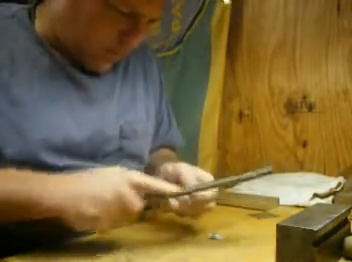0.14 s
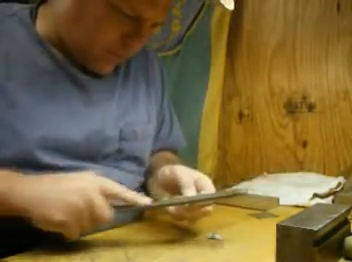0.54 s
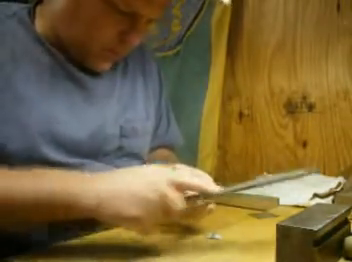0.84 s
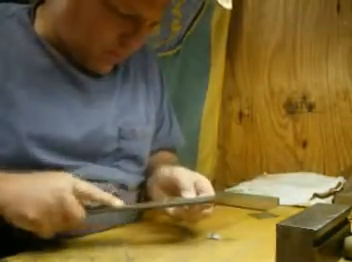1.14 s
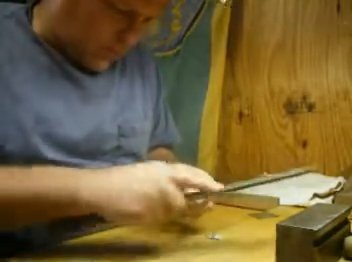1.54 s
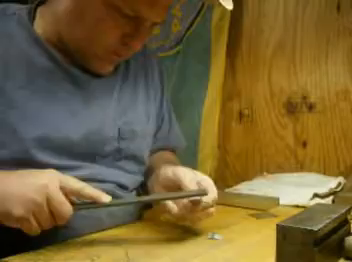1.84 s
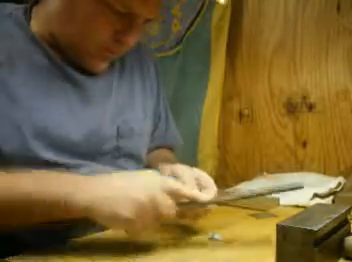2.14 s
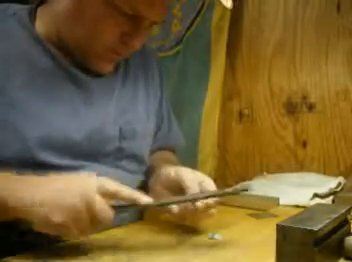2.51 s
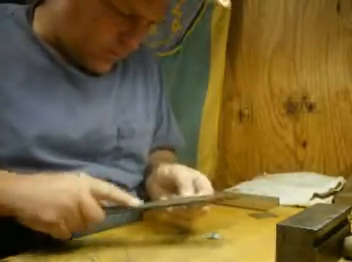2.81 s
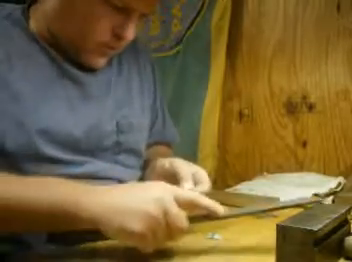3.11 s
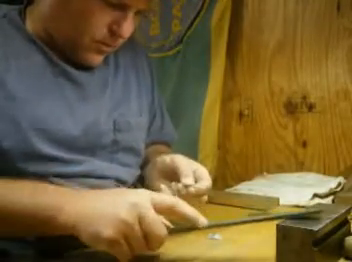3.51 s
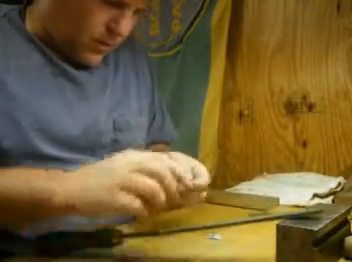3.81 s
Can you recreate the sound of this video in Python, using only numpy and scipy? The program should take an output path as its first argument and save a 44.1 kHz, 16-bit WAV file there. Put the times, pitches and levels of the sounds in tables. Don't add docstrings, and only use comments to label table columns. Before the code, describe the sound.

A hand file rasps on a metal strip, already mid-stroke until 0.16 s, then pushes at about 0.6-0.9, 1.3-1.6, 2.05-2.35 and 2.85-3.1 s. Each is gritty and metallic, singing around its ticks and clicking off. Soft bumps fall at 1.8 and 2.4 s. The file clatters and skids on wood at 3.38 s; the strip clacks loudest at 3.63-3.7 s. Dry small shop, faint hum, coarse lo-fi sound.

```python
import sys
import numpy as np
from scipy import signal
from scipy.fft import rfft, irfft
from scipy.io import wavfile
from scipy.ndimage import uniform_filter1d

SR = 44100
rng = np.random.default_rng(int(sys.argv[2]) if len(sys.argv) > 2 else 0)


def linear_from_db(decibels):
    return 10 ** (np.asarray(decibels, float) / 20)


def put_to_file(sound):
    columns = np.atleast_2d(sound).T
    safe = np.clip(columns, -1, 1)
    whole_steps = np.round(safe * 32767)
    wavfile.write(sys.argv[1], SR, whole_steps.astype(np.int16))


N = 174195


def rms_one(x):
    return x / np.sqrt(np.mean(x ** 2) + 1e-20)


def drift(rate_hz):
    r = np.exp(-40 * np.pi * rate_hz / SR)
    slow = signal.lfilter([1], [1, -2 * r, r * r], rng.standard_normal(N // 20 + 2002))[2000:]
    return np.interp(np.arange(N) / 20, np.arange(len(slow)), rms_one(slow))


def ring(hits, hz, t60):
    r, w = linear_from_db(-60 / (max(t60, 0.005) * SR)), 2 * np.pi * hz / SR
    return signal.lfilter([0, np.sin(w)], [1, -2 * r * np.cos(w), r * r], hits + 1e-18)


def resonate(x, hz, width_hz):
    r = np.exp(-np.pi * width_hz / SR)
    feedback = [1, -2 * r * np.cos(2 * np.pi * hz / SR), r * r]
    return signal.lfilter(np.array([1, 0, -1]) * (1 - r * r) / 2, feedback, x + 1e-18)


def colour(x, spectrum):
    hz, db = np.transpose(spectrum)
    gain = linear_from_db(np.interp(np.log(np.fft.rfftfreq(N, 1 / SR) + 1), np.log(hz), db))
    return rms_one(irfft(rfft(x) * gain, N))


def envelope(rows):
    t = np.arange(N) / SR
    s, db, *more = np.transpose(rows)
    inside = (t >= s[0]) & (t <= s[-1])
    gain = inside * linear_from_db(np.interp(t, s, db))
    progress = inside * (t - s[0]) / (s[-1] - s[0])
    return gain, progress, inside * np.interp(t, s, [db, *more][-1])


def clicks(s, db):
    out = np.zeros(N)
    out[(np.asarray(s) * SR).astype(int)] = linear_from_db(db)
    return out


def teeth():
    teeth_per_s, spread_db, chatter_db, chatter_hz = 9000, 2.6, 1.2, 150
    sizes = linear_from_db(spread_db * np.minimum(rng.exponential(1, N), 5)) * rng.choice([-1, 1], N)
    caught = rng.random(N) < teeth_per_s / SR
    return rms_one(sizes * caught * linear_from_db(chatter_db * drift(chatter_hz)))


def blows(hits, modes, crack_db, crack_s, crack_hz, extra=0, sign=-1):
    longest_s, most_cycles = 0.095, 95
    s, db, hardness_db = np.transpose(hits)
    luck_db = rng.normal(0, 1.2, (len(s), len(modes)))
    out = np.zeros(N)
    for k, (hz, level_db, t60) in enumerate(modes):
        strike_db = db + level_db - 5 + luck_db[:, k] + hardness_db * np.log2(hz / 1000)
        push = clicks(s, strike_db) + linear_from_db(level_db) * extra
        out += sign ** k * ring(push, hz, min(t60, longest_s, most_cycles / hz))
    dying = [1, -np.exp(-1 / (crack_s * SR))]
    fade = signal.lfilter([1], dying, clicks(s, db + crack_db + hardness_db))
    crack = signal.sosfilt(signal.butter(2, crack_hz, fs=SR, output="sos"), rng.standard_normal(N))
    return out + fade * rms_one(crack)


def lamp_hum():
    # f/Hz, level/dB
    hum_tones = [(120, -63.5), (360, -57), (600, -60)]
    out = np.zeros(N)
    for hz, db in hum_tones:
        turns = hz * np.arange(N) / SR + rng.random()
        out += linear_from_db(db + 2.5 + 2.0 * drift(3.7)) * np.sin(2 * np.pi * turns)
    return out


def room_tone():
    # f/Hz, level/dB
    air_colour = [(12, -17.5), (20, -14), (32, -37.5), (119, -15.5), (330, -12), (360, -13), (385, -15),
                  (698, -13), (3900, -25), (5070, -90), (8580, -120)]
    return linear_from_db(-44 + 0.18 * drift(1.7)) * colour(rng.standard_normal(N), air_colour)


def shop(x):
    t60_s, wall_cut_hz = 0.26, 3300
    out, dull = np.zeros(N), np.exp(-2 * np.pi * wall_cut_hz / SR)
    for k, lag in enumerate((rng.uniform(0.009, 0.03, 10) * SR).astype(int)):
        loop, gain, state = x.copy(), linear_from_db(-60 * lag / SR / t60_s), [0.0]
        for i in range(lag, N, lag):
            back, state = signal.lfilter([gain * (1 - dull)], [1, -dull], loop[i - lag:i], zi=state)
            loop[i:i + lag] += back[:N - i]
        out += (loop - x) * (-1) ** k
    return out


def bench_gives():
    # t/s, peak level/dB, f/Hz, t60/s
    thumps = [
        (3.376, -32.5, 148, 0.091),
        (3.438, -28, 190, 0.077),
        (3.49, -32, 202, 0.093),
        (3.631, -27, 45.3, 0.099),
        (3.673, -24, 117, 0.089),
    ]
    return sum(ring(clicks([s], db), hz, t60) for s, db, hz, t60 in thumps)


def hand_knocks():
    # t/s, peak level/dB, f/Hz, t60/s
    bumps = [
        (1.802, -33.5, 308, 0.067),
        (1.809, -37, 448, 0.085),
        (2.388, -25, 285, 0.043),
        (2.389, -35, 598, 0.068),
        (2.4, -26, 319, 0.078),
        (2.401, -42, 546, 0.081),
    ]
    return sum(ring(clicks([s], db), hz, t60) for s, db, hz, t60 in bumps)


def dropped_file():
    # t/s, peak level/dB, hardness/(dB per octave)
    landings = [
        (3.3765, -5, -4.5),
        (3.379, -12, 7),
        (3.3875, -21.5, 7.5),
        (3.404, -24.5, -5),
        (3.42, -26, 7),
        (3.428, -19.5, 3.5),
        (3.444, -23.5, 3.5),
        (3.453, -24.5, 1),
        (3.464, -17.5, -8),
        (3.488, -27.5, -5),
    ]
    # f/Hz, level/dB, t60/s
    lying_modes = [(295, -5, .07), (344.4, -4, 0.03), (440, -20.5, 0.024), (543, -1, 0.063),
                   (607, 0.5, 0.045), (661, 1.5, 0.05), (968, -14.5, 0.061), (1235, -15, 0.033),
                   (1522, -3.5, 0.034), (1694, -7, 0.02), (2400, -16, 0.04), (2890, -14.5, 0.041),
                   (3190, -3.5, 0.022), (3354, -10, 0.041)]
    # t/s, level/dB
    skid_level = [(3.378, -18), (3.41, -20), (3.43, -19.5), (3.445, -22), (3.458, -20.5), (3.472, -37),
                  (3.54, -51.5)]
    skid = linear_from_db(-24.5) * envelope(skid_level)[0] * teeth()
    knocks = blows(landings, lying_modes, -9.5, 0.0082, 2600, skid)
    return knocks + linear_from_db(6.0) * resonate(skid, 2300, 3700)


def strip_put_down():
    # t/s, peak level/dB, hardness/(dB per octave)
    edge_hits = [
        (3.632, 1.5, 1.5),
        (3.636, -11, -2),
        (3.643, -5.5, -5),
        (3.652, -8, 1.5),
        (3.661, -19, -1.5),
    ]
    # t/s, peak level/dB, hardness/(dB per octave)
    flat_hits = [
        (3.672, -2, 3),
        (3.6764, -19, 9),
        (3.682, -17, -2),
        (3.695, -19, -0.5),
        (3.708, -25.5, 6.5),
    ]
    # f/Hz, level/dB, t60/s
    edge_ring = [(306, 1.5, 0.029), (393, -7, 0.023), (564, -5.5, 0.036), (681, -2.5, 0.059),
                 (1058, -8, 0.067), (1190, -12.5, 0.02), (1507, -5.5, 0.026), (1640, -7.5, 0.027),
                 (1900, -33, 0.047), (2525, -13.5, 0.08), (2993, -19.5, 0.032), (3400, -17, 0.04),
                 (3700, -7.5, 0.04)]
    # f/Hz, level/dB, t60/s
    flat_ring = [(352, -13.5, .095), (433, -3.5, 0.039), (590, 8.5, 0.027), (635, 2.5, 0.03),
                 (682, 7, 0.039), (889, 0.5, 0.07), (1021.5, 4.5, 0.082), (1244, -3.5, 0.15),
                 (1344, -7, 0.08), (1670, 1.5, 0.018), (1860, -6, 0.017), (2400, -13, 0.051),
                 (3250, -23, 0.042)]
    edge = blows(edge_hits, edge_ring, -12.5, 0.0079, 3500)
    return edge + blows(flat_hits, flat_ring, -7.5, 0.008, 1500, sign=0.96)


def bench():
    knocks = hand_knocks() + dropped_file() + strip_put_down()
    no_bass = signal.butter(3, 275, "high", fs=SR, output="sos")
    return bench_gives() + signal.sosfilt(no_bass, knocks)


def file_ticks():
    # t/s, peak level/dB, f/Hz
    pings = [(.144, -15, 2290), (0.558, -19.5, 2560), (0.581, -25, 1500), (0.707, -10, 1850),
             (0.755, -10, 3220), (0.869, -18.5, 2210), (0.8718, -7, 2250), (1.266, -23, 2610),
             (1.459, -5.5, 3480), (1.497, -12, 2400), (1.567, -14.5, 700), (2.045, -14, 3160),
             (2.07, -7, 3100), (2.149, -9, 3500), (2.208, -4, 3180), (2.319, -6, 2640),
             (2.833, -28.5, 3000), (2.939, -11.5, 3100), (3.031, -20, 1900), (3.069, -10, 1444),
             (3.071, -18, 2400)]
    return sum(ring(clicks([s], db), hz, 4 / hz) for s, db, hz in pings)


def singing(mode_hz):
    # start t/s, end t/s, lift/dB, mode f/Hz
    songs = [(0, 0.024, 4.5, 1498), (.045, 0.124, 10.5, 1498), (.05, 0.102, 2.5, 2346),
             (.69, 0.767, 4, 3168), (0.604, 0.645, 4, 2502), (0.612, 0.635, 3.5, 476),
             (0.673, 0.669, 7, 3564), (0.748, 0.783, 4, 3564), (0.736, 0.828, 3.5, 1498),
             (0.802, 0.838, 7, 2346), (0.747, 0.788, 3, 476), (1.413, 1.476, 2.5, 3168),
             (1.48, 1.534, 5, 2346), (1.488, 1.558, 5.5, 1498), (1.467, 1.473, 15.5, 692),
             (2.136, 2.146, 12, 3564), (2.122, 2.265, 1.5, 476), (2.209, 2.231, 6, 3168),
             (2.252, 2.282, -3, 3564), (2.253, 2.328, 9.5, 1498), (2.291, 2.34, 9.5, 3168),
             (2.896, 2.924, 11, 3168), (2.932, 2.944, 8.5, 1498), (2.967, 3.025, 3, 2346),
             (3.051, 3.097, 8, 1498)]
    t = np.arange(N) / SR
    lift = np.zeros((len(mode_hz), N))
    for start, end, db, hz in songs:
        nearest = np.argmin(abs(mode_hz - hz))
        lift[nearest] += uniform_filter1d(db * ((t > start) & (t < end)) + 0.0, size=600)
    return lift


def filing():
    # t/s, level/dB, treble lift from speed/dB
    pushes = [
        [(0.0, -14.5, -11), (0.012, -19, -10), (0.03, -21.5, -4.5), (0.09, -24.5, -7), (0.135, -31.5, 2.5),
         (0.15, -40, 7.5), (0.165, -63, -1)],
        [(0.575, -37, -3), (0.61, -30.5, 1.5), (0.68, -26, -3.5), (0.75, -24.5, 2), (0.815, -23, -6.5),
         (0.858, -24.5, -5.5), (0.872, -22.5, -2.5), (0.885, -51, -1)],
        [(1.285, -47.5, 1), (1.31, -30.5, -5), (1.35, -27, -9.5), (1.42, -24.5, -6), (1.465, -25.5, 3),
         (1.505, -23, -1), (1.55, -22.5, -9.5), (1.57, -22, 0), (1.595, -64, -8)],
        [(2.06, -29.5, 1), (2.072, -32.5, 9), (2.09, -27, 3), (2.15, -22.5, 1), (2.19, -24.5, -8),
         (2.25, -22, 0.5), (2.3, -26, 4), (2.325, -27.5, -10), (2.345, -48.5, 1)],
        [(2.83, -42.5, 10.5), (2.865, -40.5, 1), (2.905, -28, -3.5), (2.945, -30.5, -5), (2.98, -30.5, -5.5),
         (3.032, -22.5, -7.5), (3.062, -27, -1.5), (3.072, -21, -3.5), (3.085, -48, -2)],
    ]
    # f/Hz, width/Hz, level early/dB, level midway/dB, level late/dB
    blade_modes = [(439.4, 170, -5.5, -9, -23), (476, 76, 3, 3.5, -6), (692, 43, -10, -6, -6),
                   (1004, 130, -1.5, -3, -4.5), (1118, 102, -9, -10.5, -8), (1498, 52, -2.5, 0.5, -3),
                   (1710, 100, -23.5, -16.5, -1), (1900, 100, 0, 3, -1), (2304, 420, -12, -4.5, -8),
                   (2502, 30, 0.5, 7, 0), (2700, 670, -44.5, -19, -18.5), (3168, 48, -2.5, 5.5, 3),
                   (3510, 66, -8.5, -12.5, -6.5), (3564, 43, -1.5, 9.5, -9)]
    # f/Hz, level/dB
    rasp_colour = [(30, -25.5), (70, -19), (130, -28), (280, -9.5), (450, -13.5), (1200, -4), (2300, -2),
                   (3300, 3), (4000, -4)]
    pressure, along, lift_db = np.sum([envelope(rows) for rows in pushes], axis=0)
    first = int(0.2 * SR)
    along[:first] = 0.5 + along[:first] / 2
    grains, ticks = teeth(), file_ticks()
    sing_db = singing(np.transpose(blade_modes)[0])
    wander_db, wander_hz, narrowest_hz = 1.2, 14, 75
    gains = [linear_from_db(np.interp(along, [0, 0.5, 1], db) + wander_db * drift(wander_hz))
             for _, _, *db in blade_modes]

    def blade(x, extra_db):
        out = np.zeros(N)
        for k, (hz, width_hz, *_) in enumerate(blade_modes):
            push = x * gains[k] * linear_from_db(extra_db[k])
            out += (-1) ** k * resonate(push, hz, max(width_hz, narrowest_hz))
        return out

    drive = grains * pressure / np.std(blade(grains, 0 * sing_db)) + linear_from_db(2) * ticks
    rasp = blade(drive, sing_db) + linear_from_db(1.5) * pressure * colour(grains, rasp_colour)
    low = signal.sosfiltfilt(signal.butter(2, 2740, fs=SR, output="sos"), rasp)
    return low + linear_from_db(lift_db) * (rasp - low) + ticks


def scene():
    work = filing() + bench()
    return (work + linear_from_db(-19) * shop(work) + room_tone() + lamp_hum())[None]


def top_cut(x):
    return signal.sosfilt(signal.butter(12, 15580, fs=SR, output="sos"), x)


def record(dry):
    sampling_hz, steps, offset, clip_top = 8000, 128, -0.0064, 1.03
    slow = signal.resample_poly(dry[0], 160, 441)
    slow = slow + linear_from_db(-62.5) * rng.standard_normal(len(slow))
    slow = signal.sosfilt(signal.cheby1(6, 0.5, 3880, fs=2 * sampling_hz, output="sos"), slow)
    slow = np.round(np.clip(slow[2::2] + offset, -clip_top, clip_top) * steps)
    joined = np.interp(np.arange(N) * sampling_hz / SR, np.arange(len(slow)), slow)
    out = np.floor(joined) / steps
    out = signal.sosfiltfilt(signal.ellip(8, 0.1, 14, 14550, fs=SR, output="sos"), out)
    out = signal.sosfiltfilt(signal.butter(8, 14300, fs=SR, output="sos"), out) / 2 + out / 2
    return top_cut(np.clip(out, -1, 1)[None])


dry = scene()
out = record(dry)
put_to_file(out)
```